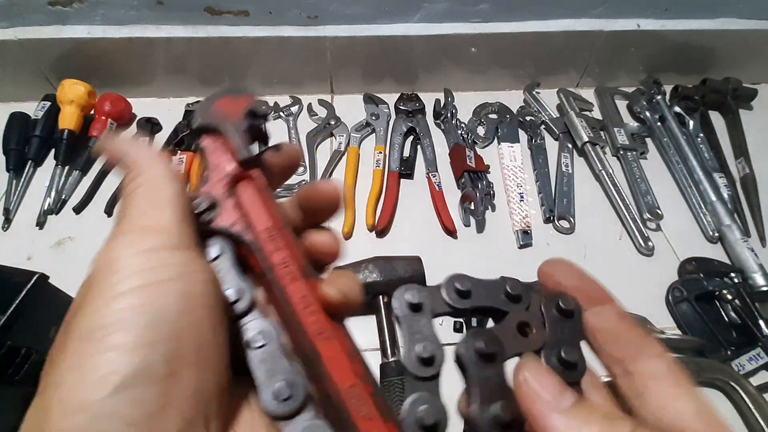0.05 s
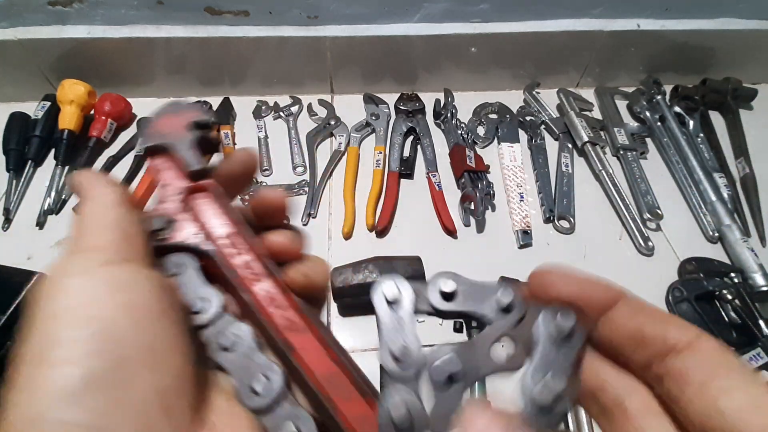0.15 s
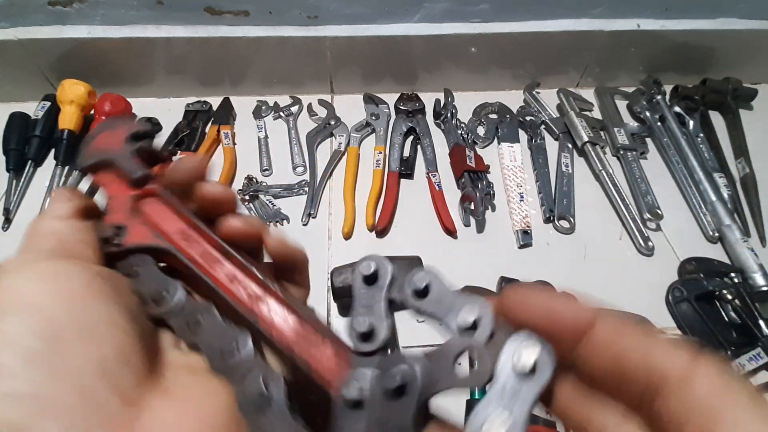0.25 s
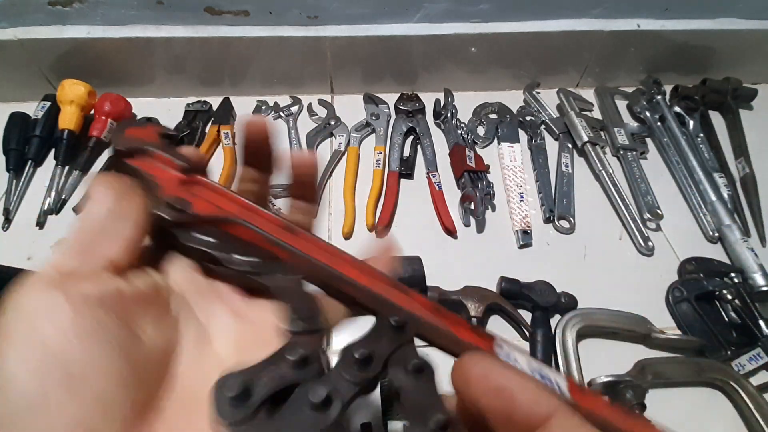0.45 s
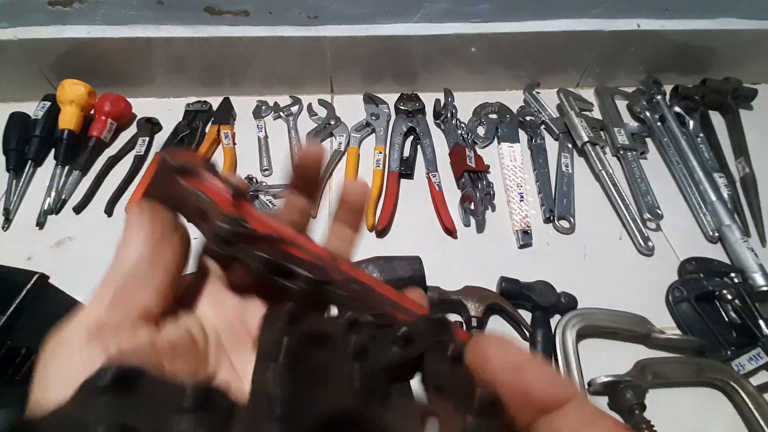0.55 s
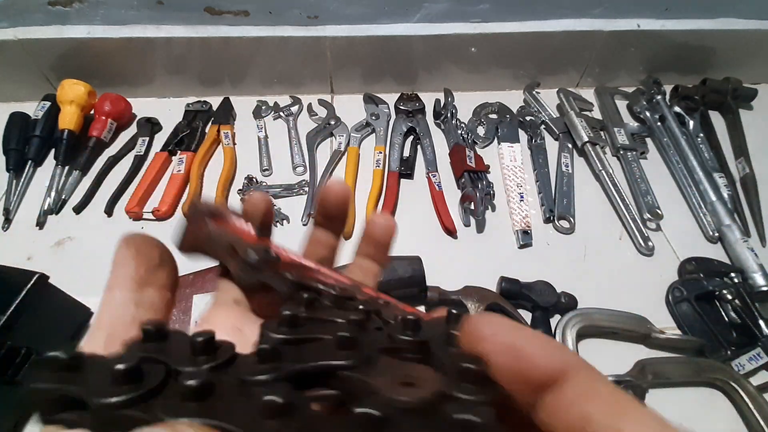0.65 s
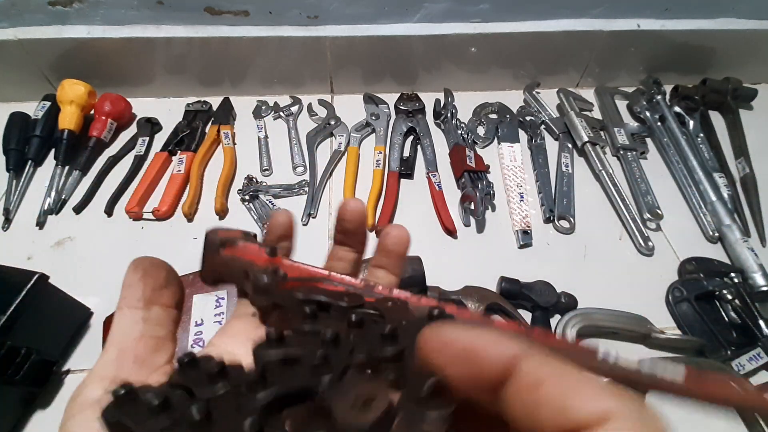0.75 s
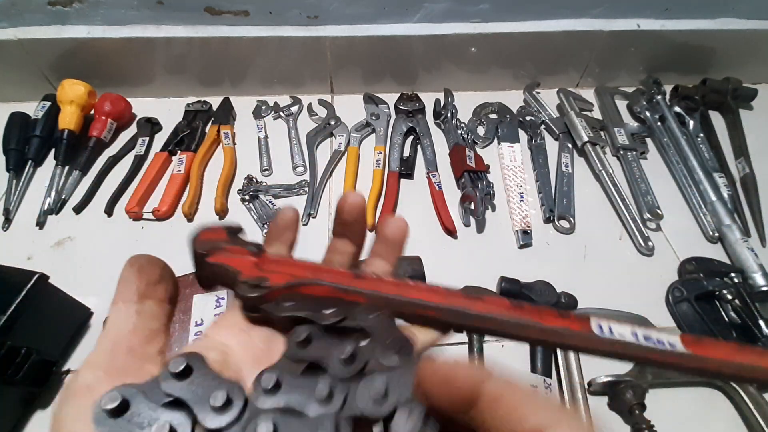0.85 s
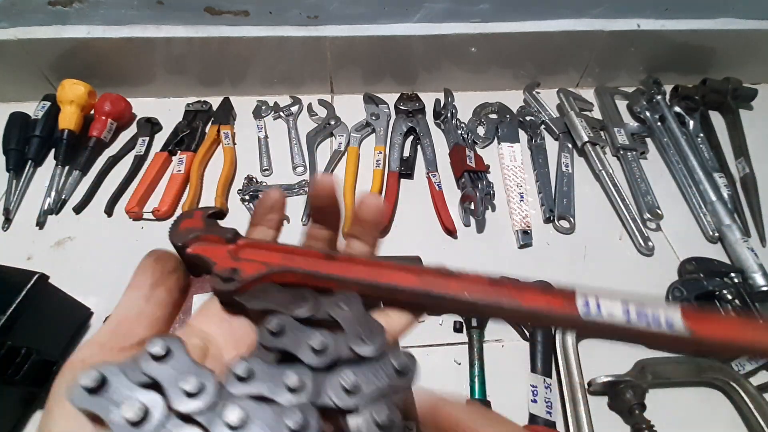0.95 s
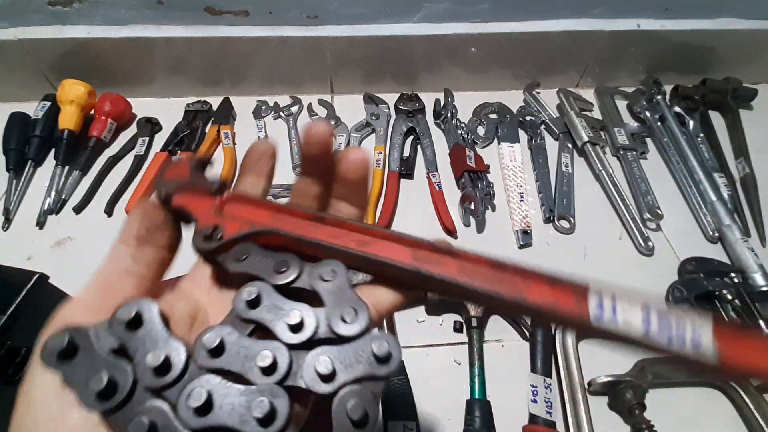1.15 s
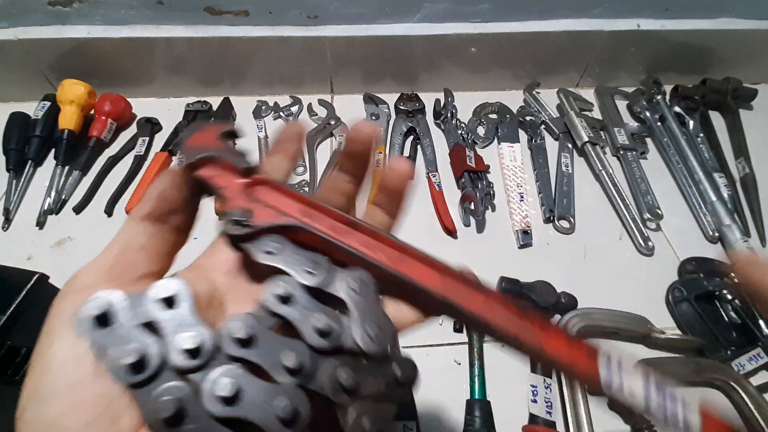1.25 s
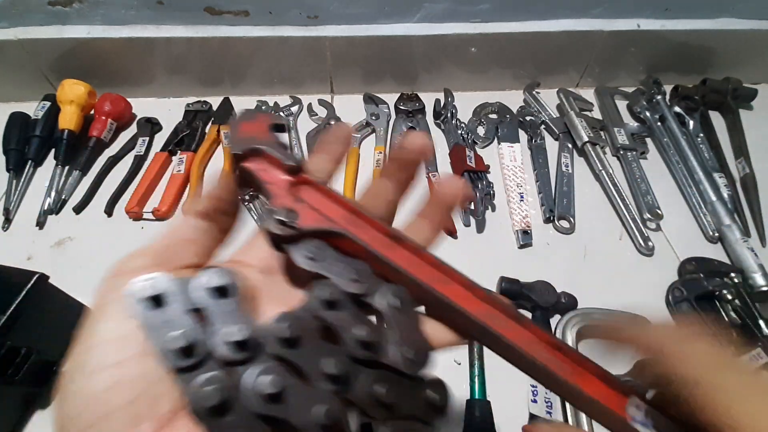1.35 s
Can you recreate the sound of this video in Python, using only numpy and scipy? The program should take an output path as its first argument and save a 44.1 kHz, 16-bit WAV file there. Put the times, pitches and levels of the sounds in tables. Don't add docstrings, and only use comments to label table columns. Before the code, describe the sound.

Heavy chain links rattle and knock a steel handle in the hands, bright, dry and short-ringing, loudest in the first half second; afterwards only sparse tiny ticks and skin brushing over low room rumble, miked closely.

```python
import sys
import numpy as np
from scipy import signal
from scipy.fft import rfft, irfft, next_fast_len
from scipy.io import wavfile

SR = 44100
rng = np.random.default_rng(int(sys.argv[2]) if len(sys.argv) > 2 else 0)


def dump(signal):
    limited = np.clip(np.atleast_2d(signal).T, -1, 1)
    pcm = np.round(limited * 32767).astype(np.int16)
    wavfile.write(sys.argv[1], SR, pcm)


def invert_db(level):
    return 10 ** (np.asarray(level, dtype=float) / 20)


N = 61739

# (frequency [Hz], level [dB per Hz])
ROOM_TONE_COLOUR = [(25, -31), (65, 4), (130, -8), (300, -21), (900, -42.5), (1700, -30.5), (8800, -60),
                    (13000, -41.5)]
# (frequency [Hz], correlation [-1 to 1])
LIKENESS = [(40, 1), (300, 0.18), (3000, 0.033)]
# (time [s], centre frequency [Hz], level [dB])
SLIDE = [
    (0, 3600, -53),
    (.04, 3513, -54.5),
    (.09, 3170, -50.5),
    (.13, 3130, -59),
    (.2, 2790, -58),
    (.3, 2900, -100),
]
# (time [s], level [dB])
BRUSH = [(0, -75), (.035, -76), (.045, -67), (.13, -67), (.16, -68), (.22, -61), (.28, -71), (.32, -85),
         (.42, -60), (.6, -63.5), (.75, -78), (.82, -69.5), (.92, -71), (.95, -81.5), (1.17, -83),
         (1.2, -74), (1.4, -72.5)]
BRUSH_BAND_HZ = [10000, 15800]
# (time [s], level [dB])
RATTLE = [(0, -70), (.13, -64.5), (.21, -63), (.3, -63), (.42, -36.5), (.52, -56), (.6, -60.5), (.7, -70),
          (.9, -65.5), (1.0, -76.5), (1.17, -77), (1.22, -69), (1.4, -75.5)]
# (frequency [Hz], level [dB per Hz])
RATTLE_COLOUR = [(300, -44), (1800, -21.5), (3100, -3.5), (5200, -5), (7000, -7.5), (9000, -19),
                 (13000, -17.5), (16600, -34.5)]
# (frequency [Hz], level [dB per Hz])
CONTACT_COLOUR = [(300, -53), (1800, -24.5), (3100, -2), (4800, -2.5), (8500, -9.5), (13000, -14),
                  (14500, -20.5), (16600, -34)]
# (time [s], crack [dB], ring [dB], brightness [dB per octave], left-right [dB])
CLICKS = [(0.0376, -27.5, -87, 17, 9), (.1180, -55, -99, 11, 9), (.1295, -56, -99, 14, 7),
          (0.1313, -51, -99, 3, 0), (0.1824, -25.5, -87, 6.5, 10.5), (0.2142, -18.5, -72, 9.5, 10.5),
          (.2500, -33, -75, -5, 6), (.3435, -11, -49, 14, 8), (0.373, -25.5, -46, 2, 4),
          (.4040, -28, -55, 6, 3), (.4900, -33, -75, 10, -2), (0.4976, -21.5, -56, 2, 12),
          (0.5024, -9.5, -25.5, 1.5, 8.5), (.5160, -40, -57.5, -1.5, -1.5), (.5635, -32, -59.5, 16, 5),
          (0.584, -32, -57, 15, 4), (0.746, -59, -81, -12, 14), (0.769, -35, -84, -7.5, 7.5),
          (0.8794, -47, -86.5, -2.5, 4), (0.918, -51, -90, -5, 5), (0.964, -58.5, -88, 8.5, -3),
          (1.0800, -63, -92, 16, 0), (1.1850, -52.5, -80, 4.5, -0.2), (1.256, -60, -86.5, -3, 1),
          (1.2870, -60, -88, -15, -4.5)]
LINK_HZ = [4825, 9322, 9390, 8107, 12480, 13050]
# (level [dB], decay t60 [s], left-right [dB])
LINK_MODES = [(1.5, 0.022, -8), (-5.5, 0.062, 7), (-5, 0.019, -1), (-21, .025, 5.5), (-14.5, 0.068, -3),
              (-7.5, 0.036, -5.5)]
# (time [s], crack [dB], bending [dB], twisting [dB], edge [dB])
KNOCKS = [(0.1417, -26.5, -38.5, -51, -49.5), (0.1997, -27, -39.5, -66, -62),
          (0.2071, -27, -40, -57.5, -56.5), (0.2122, -23.5, -43, -55.5, -53.5),
          (0.222, -44, -45.5, -68.5, -63), (0.2588, -54.5, -46.5, -64.5, -55.5),
          (0.2962, -9, -20.5, -35, -24.5), (0.318, -30.5, -40, -52, -50),
          (0.3364, -15.5, -20.5, -22.5, -12.5), (0.3927, -15.5, -18, -21, -17.5),
          (0.5019, -10, -34, -39.5, -32), (0.7688, -49, -60, -66.5, -78), (0.9025, -30, -41.5, -48, -47)]
# (crack brightness [dB per octave], ring brightness [dB per octave])
HARDNESS = [(-7, -3), (-12.5, -2), (-5, 0), (-5, -8), (-8.5, 2.5), (-6.5, -0.5), (-5, 1.2), (-6.5, -7.5),
            (-4.5, 2.8), (-0.5, 0.9), (-1, 1.8), (-5, -3), (-9, 1)]
JAW_HZ = [3130, 3210]
EDGE_HZ = [5820, 5740, 7195, 7250, 9270]
BENDING_HZ = [1505, 2582, 2986, 2940, 4820, 4852]
TWISTING_HZ = [546, 1134, 3065, 5433, 5490, 9935]
# (level [dB], decay t60 [s], left-right [dB])
JAW_MODES = [(-9.5, 0.044, 2.5), (-9, .015, 3.5)]
EDGE_MODES = [(-15, 0.098, 4), (-13, .025, 2), (-5, 0.11, -0.5), (0.5, 0.041, 1.5), (-17, 0.041, 0)]
BENDING_MODES = [(-8.5, 0.13, -4), (-15.5, 0.06, -4), (-2.5, 0.11, 5), (-7.5, 0.045, -0.5),
                 (0.5, 0.049, 3.5), (-4.5, 0.17, -2)]
TWISTING_MODES = [(-22, .22, 13), (-9.5, 0.071, 14), (2, 0.11, 3.5), (-3, 0.18, -2.5), (-4.5, 0.056, -6.5),
                  (-1, 0.049, -5)]
# (time [s], level [dB])
DRAG = [(.1, -100), (.25, -82), (.45, -65.5), (.62, -69), (.72, -98), (.91, -67.5), (1.0, -95), (1.18, -85),
        (1.195, -62.5), (1.27, -73.5), (1.4, -90)]
DRAG_HZ = [1500, 2982, 4860, 5810, 7210, 9400, 9920, 12480, 13030]
# (level [dB], decay t60 [s])
DRAG_MODES = [(-4.5, 0.13), (-8, .15), (-1, 0.095), (-17, .1), (-4.5, .1), (-16.5, 0.071), (-15.5, .1),
              (-4.5, .05), (-4, .06)]
# (frequency [Hz], start [s], length [s], level [dB])
FAR = [
    (1709, 0.54, 0.15, -67.5),
    (1382, 1.316, 0.13, -69.5),
    (1515, 0.844, 0.09, -76),
    (2037, 1.336, 0.19, -64.5),
    (2310, 1.33, 0.074, -75),
    (2124, 1.16, 0.15, -80),
    (1810, 0.59, 0.1, -67),
    (896, 1.37, 0.027, -74.5),
    (348, 1.16, 0.22, -72),
    (1540, 0.71, 0.089, -69),
]
# (time [s], level [dB])
SQUEAK = [
    (1.055, -110),
    (1.075, -76),
    (1.2, -77),
    (1.325, -77),
    (1.365, -80),
    (1.38, -110),
]
# (time [s], frequency [Hz])
SQUEAK_HZ = [
    (1.07, 1355),
    (1.12, 1362),
    (1.15, 1465),
    (1.19, 1515),
    (1.225, 1580),
    (1.25, 1590),
    (1.275, 1535),
    (1.33, 1335),
    (1.375, 1180),
]
# (multiple of the rate, level [dB])
SQUEAK_PARTIALS = [(6, -16), (8, -1.5), (9, -1.5)]

RIGHT_LAG_S = 0.0002
STRIKE_SPREAD_DB, FLUTTER_DB = 1.5, 2.5
OWN_SHARE = 0.47
CRACK_DB, CONTACT_CUT_HZ = -9.5, 1000
SNAP_DB, SNAP_T60_S = 6.5, 0.0017
SHIVER_DB, SHIVER_T60_S = -23, 0.044
CLICK_T60_S, KNOCK_T60_S, KNOCK_LEFT_DB = 0.009, 0.026, 7
THUMP_S, THUMP_DB, THUMP_RIGHT_DB = 0.337, -9.5, -38
THUMP_HZ, THUMP_T60_S = 49, 0.031
THUMP_DROP_HZ, THUMP_DROP_S = 289.7, 0.0013
ROOM_T60_S, ROOM_DB, WALL_CUT_HZ = 0.33, -23.5, 7000


def in_time(rows):
    s, *columns = np.transpose(rows)
    return [np.interp(np.arange(N) / SR, s, column) for column in columns]


def at_hz(points, hz):
    knots_hz, values = np.transpose(points)
    return np.interp(np.log(hz + 1), np.log(knots_hz), values)


def rms_one(x):
    return x / np.sqrt(np.mean(x ** 2) + 1e-20)


def drift(rate):
    knots = rng.standard_normal(64)
    return np.interp(np.arange(N) / SR * rate, np.arange(len(knots)), knots)


def pair(pan_db):
    return invert_db(np.array([0.5, -0.5]) * np.clip(pan_db, -15, 15))


def at_ears(s):
    return int(s * SR), int((s + RIGHT_LAG_S) * SR)


def filtered(x, order, hz, kind="low"):
    return signal.sosfilt(signal.butter(order, hz, kind, fs=SR, output="sos"), x)


def decay_and_turn(hz, t60):
    return invert_db(-60 / (t60 * SR)), 2 * np.pi * hz / SR


def room_tone():
    out, edges = 0, 24 * 2 ** np.arange(0, 9.6, 0.5)
    white = rng.standard_normal((2, 2, N + SR))
    for k, (low, high) in enumerate(zip(edges, edges[1:])):
        mid, side = filtered(white[k % 2], 2, [low, high], "band")[:, SR:]
        hz = np.sqrt(low * high)
        alike = at_hz(LIKENESS, hz)
        stereo = np.sqrt(1 + alike) * mid + np.sqrt(1 - alike) * side * [[1], [-1]]
        out = out + invert_db(at_hz(ROOM_TONE_COLOUR, hz) + 2.3 * drift(2.7)) * stereo
    out = filtered(out, 2, 42, "high")
    return invert_db(-56) * rms_one(out) * pair(2.5)[:, None]


def palm():
    hz, db = in_time(SLIDE)
    a, b = filtered(rng.standard_normal((2, 2, N)), 3, 450)
    phase = 2 * np.pi * np.cumsum(hz) / SR
    return invert_db(db + 2.8 * drift(32.94)) * rms_one(a * np.cos(phase) + b * np.sin(phase))


def brush():
    level_db = in_time(BRUSH)[0] + 2.0 * drift(40)
    hiss = filtered(rng.standard_normal((2, N)), 3, BRUSH_BAND_HZ, "band")
    return invert_db(level_db) * rms_one(hiss)


def rattle():
    sizes = invert_db(3.0 * np.minimum(rng.exponential(1, (2, N)), 4))
    struck = rng.random(N) < 6000 / SR
    bursts = signal.lfilter([1], [1, -0.985], sizes * struck) * rng.standard_normal((2, N))
    colour = invert_db(at_hz(RATTLE_COLOUR, np.fft.rfftfreq(N, 1 / SR)))
    return invert_db(in_time(RATTLE)[0]) * rms_one(irfft(rfft(bursts) * colour, N))


def cracks(s, db, tilt_db, pan_db, t60):
    size = 4096
    out = np.zeros((2, N + 2 * size))
    t, hz = np.arange(size) / SR, np.fft.rfftfreq(size, 1 / SR)
    snap = invert_db(SNAP_DB - 60 * t / SNAP_T60_S)
    shiver = invert_db(SHIVER_DB - 60 * t / SHIVER_T60_S)
    shape = snap + invert_db(-60 * t / t60) + shiver
    octaves = np.log2(np.maximum(hz, 1500) / 4000)
    for j, white in enumerate(rng.standard_normal((len(s), 3, size))):
        colour = invert_db(at_hz(CONTACT_COLOUR, hz) + tilt_db[j] * octaves)
        mixed = np.sqrt(1 - OWN_SHARE) * white[0] + np.sqrt(OWN_SHARE) * white[1:]
        noise = rms_one(irfft(rfft(mixed) * colour, size))
        gains = invert_db(db[j] + CRACK_DB) * pair(pan_db[j])
        for ear, i in enumerate(at_ears(s[j])):
            out[ear, i:i + size] += gains[ear] * shape * noise[ear]
    return filtered(out[:, :N], 3, CONTACT_CUT_HZ, "high")


def ringing(pitches, modes, s, db, bright_db, pan_db):
    out = np.zeros((2, N))
    chance = rng.standard_normal((len(s), len(modes), 2))
    for k, (hz, (mode_db, t60, side_db)) in enumerate(zip(pitches, modes)):
        blows = np.full((2, N), 1e-18)
        signs = np.array([1, (-1) ** k])
        for j in range(len(s)):
            level_db = db[j] + mode_db + bright_db[j] * np.log2(hz / 4000) + STRIKE_SPREAD_DB * chance[j, k]
            blows[(0, 1), at_ears(s[j])] += invert_db(level_db) * pair(pan_db[j] + side_db) * signs
        r, w = decay_and_turn(hz, t60)
        flutter = invert_db(FLUTTER_DB * np.roll(drift(44), 997 * k))
        out += flutter * signal.lfilter([0.5, 0, -0.5], [1, -2 * r * np.cos(w), r * r], blows)
    return out


def links():
    s, db, ring_db, tilt_db, pan_db = np.transpose(CLICKS)
    contact = cracks(s, db, tilt_db, pan_db, CLICK_T60_S)
    return contact + ringing(LINK_HZ, LINK_MODES, s, ring_db + 7.5, 0 * s, pan_db)


def handle():
    s, db, bend_db, twist_db, edge_db = np.transpose(KNOCKS)
    tilt_db, bright_db = np.transpose(HARDNESS)
    families = [(JAW_HZ, JAW_MODES, db), (EDGE_HZ, EDGE_MODES, edge_db),
                (BENDING_HZ, BENDING_MODES, bend_db), (TWISTING_HZ, TWISTING_MODES, twist_db)]
    out = cracks(s, db, tilt_db, 0 * s + KNOCK_LEFT_DB, KNOCK_T60_S)
    for hz, modes, level_db in families:
        out = out + ringing(hz, modes, s, level_db, bright_db, 0 * s)
    return out


def room(x):
    size = next_fast_len(N + SR)
    w = 2 * np.pi * np.fft.rfftfreq(size)
    dull = 1 / (1 + 1j * w * SR / (2 * np.pi * WALL_CUT_HZ))
    out = np.zeros((2, len(w)), complex)
    lags = (rng.uniform(0.0068, 0.034, 16) * SR).astype(int)
    for k, lag in enumerate(lags):
        loop = invert_db(-60 * lag / SR / ROOM_T60_S) * dull * np.exp(-1j * w * lag)
        out[k % 2] += loop / (1 - loop) * (-1) ** (k // 2)
    return irfft(out * rfft(x, size), size)[:, :N]


def drag():
    out, white = 0, rng.standard_normal((2, N))
    for hz, (mode_db, t60) in zip(DRAG_HZ, DRAG_MODES):
        r, w = decay_and_turn(hz, t60)
        out = out + invert_db(mode_db) * rms_one(signal.lfilter([1], [1, -2 * r * np.cos(w), r * r], white))
    return invert_db(in_time(DRAG)[0]) * out


def thump():
    t = np.maximum(np.arange(N) / SR - THUMP_S, 0)
    turns = THUMP_HZ * t + THUMP_DROP_HZ * THUMP_DROP_S * (1 - np.exp(-t / THUMP_DROP_S))
    push = invert_db(THUMP_DB - 60 * t / THUMP_T60_S) * np.sin(2 * np.pi * turns)
    return push * invert_db(np.array([[0], [THUMP_RIGHT_DB]]))


def far_scrape():
    out, t = 0, np.arange(N) / SR
    for (hz, s, length, db), white in zip(FAR, rng.standard_normal((len(FAR), 2, N))):
        tone = filtered(white, 2, [hz - 20, hz + 20], "band")
        swell = np.sin(np.pi * np.clip((t - s) / length, 0, 1)) ** 0.5
        out = out + invert_db(db) * rms_one(tone) * swell
    return out


def squeak():
    (hz,), (db,) = in_time(SQUEAK_HZ), in_time(SQUEAK)
    phase = 2 * np.pi * np.cumsum(hz * (1 + 0.001 * drift(45))) / SR
    out = 0
    for multiple, partial_db in SQUEAK_PARTIALS:
        out = out + invert_db(db + partial_db + 3.0 * drift(30)) * np.sin(multiple * phase)
    return out * np.array([[1], [0.8]])


def scene():
    steel = handle() + links()
    reverberation = invert_db(ROOM_DB) * room(steel[0])
    contact = rattle() + drag()
    skin = brush() + palm() + squeak()
    return steel + reverberation + contact + skin + thump() + far_scrape() + room_tone()


def band_limit(x):
    return signal.sosfilt(signal.butter(12, 16970, fs=SR, output="sos"), x)


def record(dry):
    limit = 0.88
    rounded = limit * np.tanh(dry / limit)
    mix = signal.sosfilt(signal.cheby2(12, 70, 17300, fs=SR, output="sos"), rounded)
    return band_limit(mix)


dry = scene()
out = record(dry)
dump(out)
```